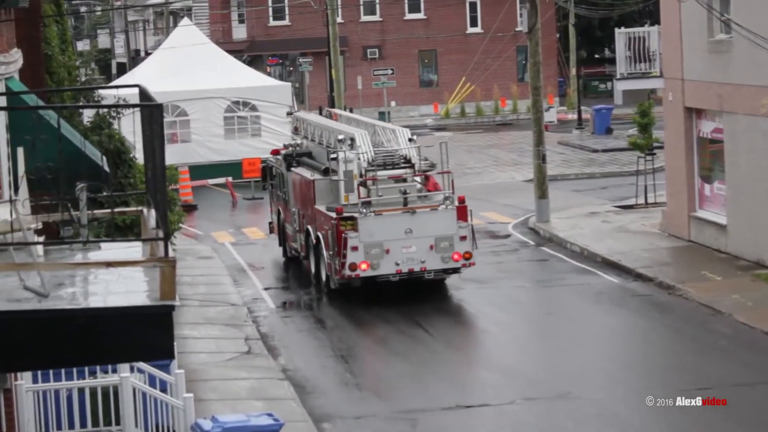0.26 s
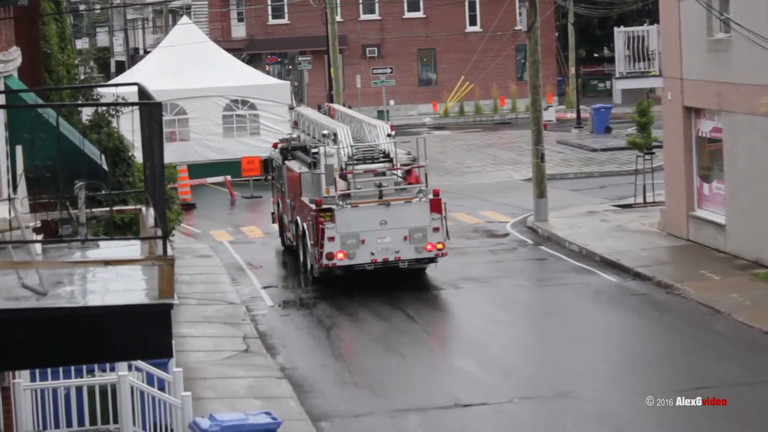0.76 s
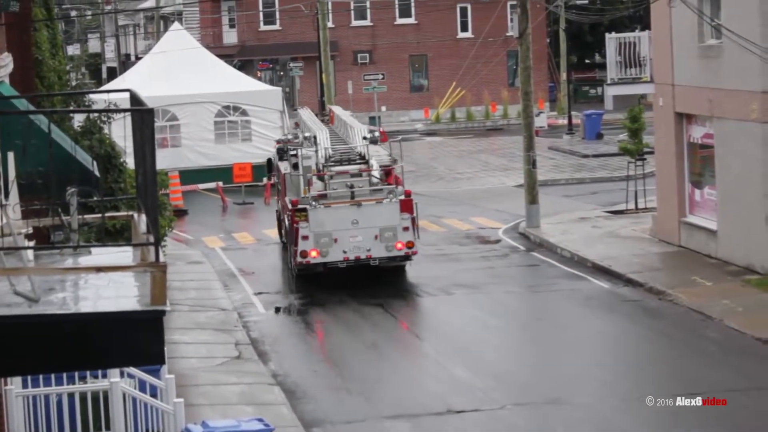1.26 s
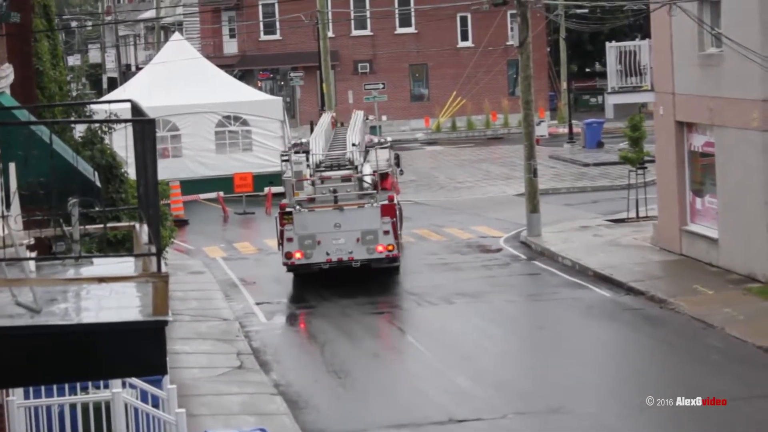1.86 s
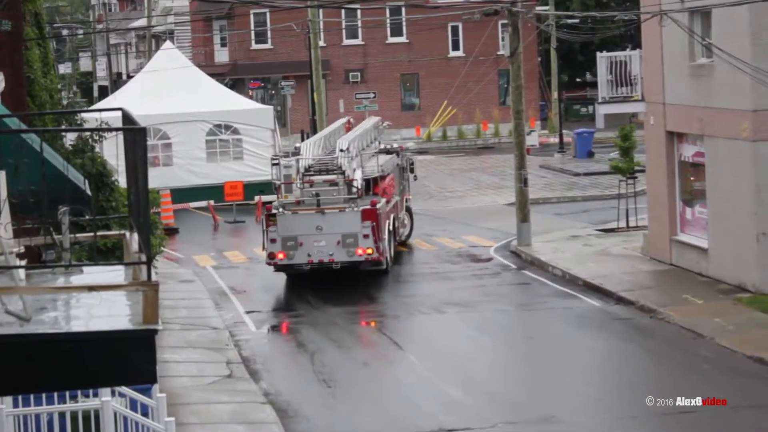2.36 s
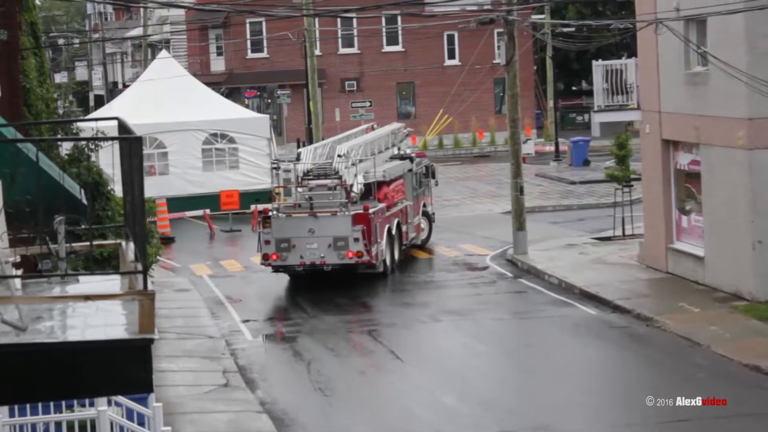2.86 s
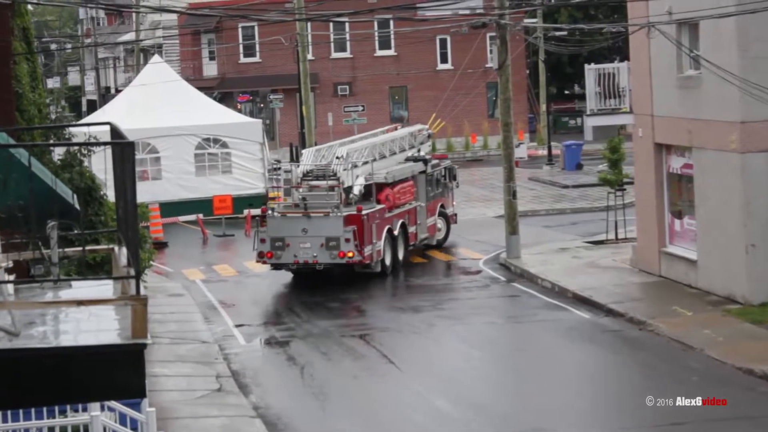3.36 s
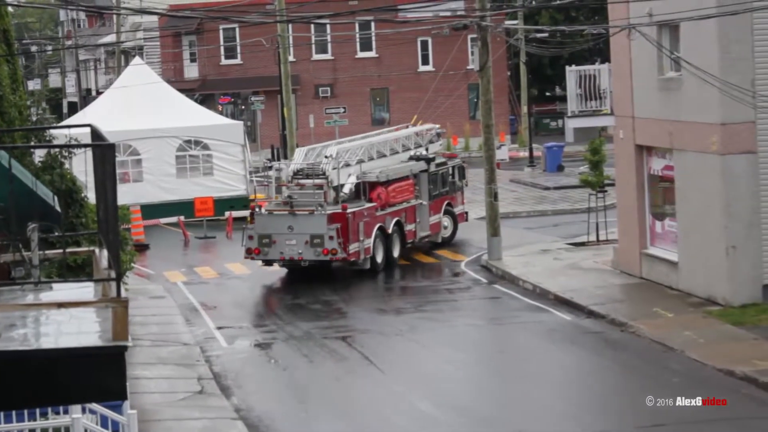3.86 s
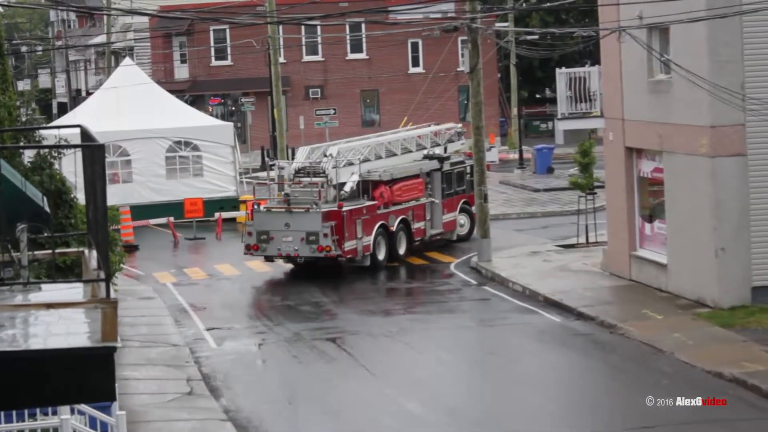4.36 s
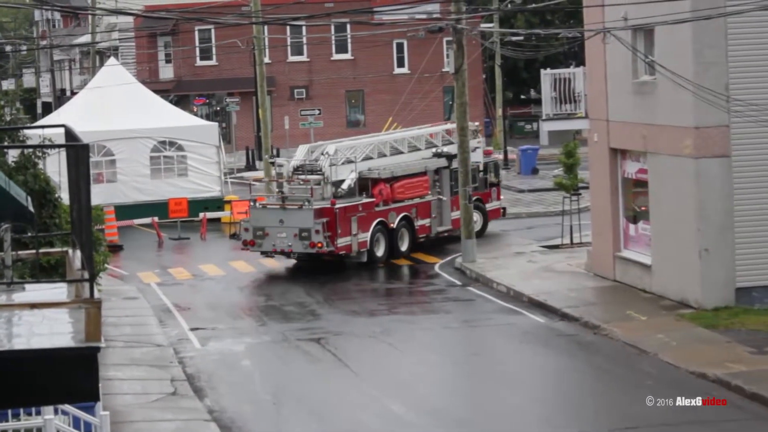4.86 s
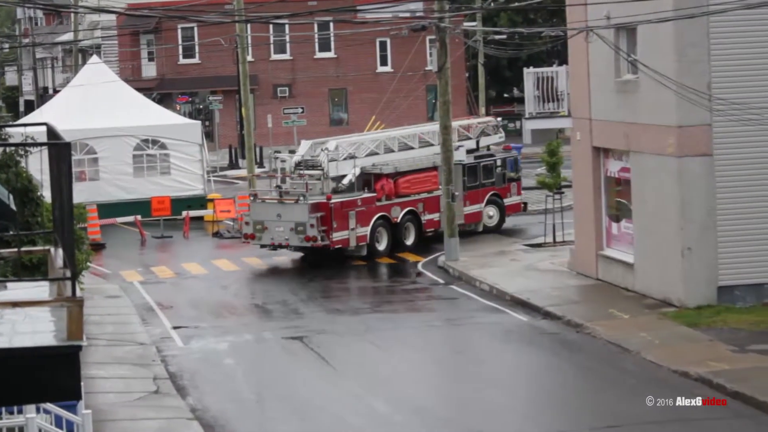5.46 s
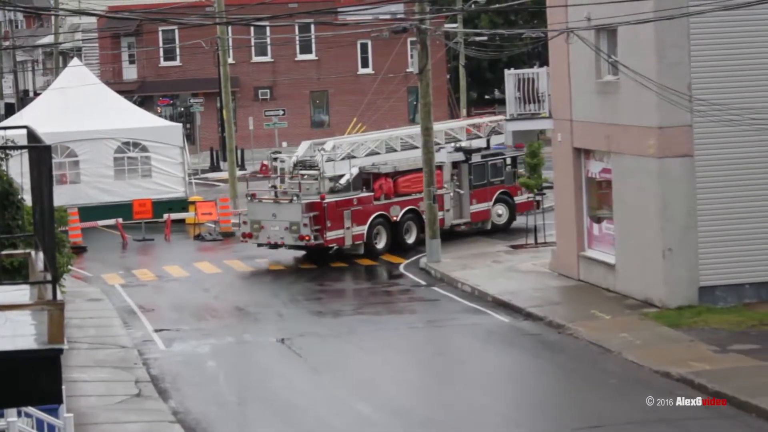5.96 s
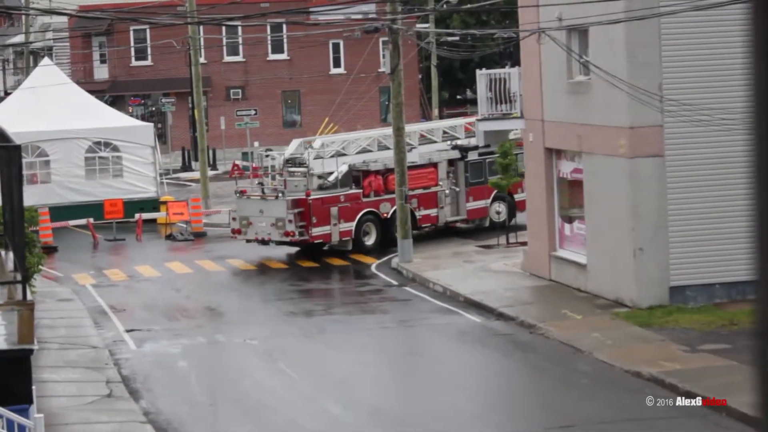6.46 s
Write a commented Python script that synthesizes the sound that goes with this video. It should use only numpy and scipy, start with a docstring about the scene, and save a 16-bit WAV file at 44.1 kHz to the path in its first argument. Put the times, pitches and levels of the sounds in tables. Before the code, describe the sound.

Big diesel engine eases down to a loud, booming idle on a wet street, air leaking briefly, then a short raspy squeal and faint rattles.

```python
"""Diesel truck turning on a wet street

A diesel ladder truck creeps away round a corner, its revs sinking to a throbbing idle.
The exhaust is a stack of steady tones tied to the engine cycle; block, housing and covers are shaken noise.
Tyre hiss and air leaks are coloured noise; one honking squeak is a set of wavering tones over a rasp.
A few creaks and light ticks are short bursts of noise, each round one pitch."""
import sys
import numpy as np
from scipy import signal
from scipy.fft import rfft, irfft, next_fast_len
from scipy.io import wavfile
from scipy.ndimage import uniform_filter1d, minimum_filter1d

SR = 44100
rng = np.random.default_rng(int(sys.argv[2]) if len(sys.argv) > 2 else 0)


def output_pcm(signal):
    """Save a mono or channel-first signal as 16-bit PCM at the path in sys.argv[1].

    Samples are clipped to [-1, 1] before scaling.
    """
    pcm = np.clip(np.atleast_2d(signal).T, -1, 1) * 32767
    wavfile.write(sys.argv[1], SR, np.round(pcm).astype(np.int16))


N = 295470
TIME = np.arange(N) / SR   # seconds
IDLE_RATE, EASING_RATE, REVVED_RATE = 11, 11.8, 12.7   # engine cycles per second


def from_db(db):
    """Turn decibels into gain."""
    return 10 ** (np.asarray(db) / 20)


def rms_one(x):
    """Scale to an rms (average strength) of 1."""
    return x / np.sqrt(np.mean(x ** 2) + 1e-20)


def in_time(rows):
    """Draw straight lines between the rows: each column's value at every sample."""
    s, *columns = np.transpose(rows)
    return [np.interp(TIME, s, column) for column in columns]


def drift(rate_hz):
    """Smooth random wandering with rms 1; a higher rate wanders faster."""
    step = 100   # worked out at every 100th sample, then joined by lines
    pole = np.exp(-2 * np.pi * rate_hz * step / SR)
    chance = rng.standard_normal(N // step + 2002)
    slow = signal.lfilter([1], [1, -2 * pole, pole * pole], chance)[2000:]
    return np.interp(np.arange(N) / step, np.arange(len(slow)), rms_one(slow))


def noise():
    """White noise: all pitches equally strong."""
    return rng.standard_normal(N)


def coloured(x, spectrum):
    """Filter a sound by a curve that falls 40 dB per octave beyond its ends; rms 1."""
    size = next_fast_len(N)
    octave = np.log2(np.maximum(np.fft.rfftfreq(size, 1 / SR), 1))
    hz, db = np.transpose(spectrum)
    curve_db = np.interp(octave, np.log2(hz), db)
    beyond = np.abs(octave - np.clip(octave, np.log2(hz[0]), np.log2(hz[-1])))
    filtered = rfft(x, size) * from_db(curve_db - 40 * beyond)
    return rms_one(irfft(filtered, size)[:N])


def resonance(x, hz, width_hz):
    """Ring at one pitch, like a struck panel (two-pole filter); rms 1."""
    pole = np.exp(-np.pi * width_hz / SR)
    ring = [1, -2 * pole * np.cos(2 * np.pi * hz / SR), pole * pole]
    return rms_one(signal.lfilter([1, 0, -1], ring, x))


def double_resonance(x, hz, width_hz):
    """Ring twice in a row, for a more pure pitch; rms 1."""
    return resonance(resonance(x, hz, width_hz), hz, width_hz)


def beats(turns, depth_db):
    """A gain that peaks at every whole turn, or midway if the depth is negative; rms 1."""
    return rms_one(from_db(depth_db * np.cos(2 * np.pi * turns)))


def swell(middle_s, length_s):
    """A bell-shaped rise and fall round one moment."""
    return np.exp(-2 * ((TIME - middle_s) / length_s) ** 2)


def knocks(cycle, firing_db, uneven_db, alike, count=8, size=4096):
    """Noise with a burst per firing, uneven over the cycle; part of its grain repeats on every cycle."""
    alike = np.clip(alike, 0, 1)
    place_in_cycle = (cycle * size).astype(int) % size
    repeating = rng.standard_normal(size)[place_in_cycle]
    grain = np.sqrt(alike) * repeating + np.sqrt(1 - alike) * noise()
    turns = cycle - .73
    firings = beats(count * turns, firing_db) * beats(count / 2 * turns, firing_db)
    return grain * firings * beats(2 * turns, uneven_db)


# Colour of the tyre hiss [pitch_hz, relative level_db]
TYRE_COLOUR = [(2000, -8.5), (4000, -1), (5500, 1), (7000, -1.5), (10000, -4.5), (13000, -8), (15500, -14)]


def wet_road(hiss_db, spray_db=2.0, drops_per_s=200, drop_size_db=3.4, drops_db=-6, flutter_db=.5):
    """Tyres peel water off the asphalt: a hiss with tiny splashes in it."""
    sizes = from_db(drop_size_db * np.minimum(rng.exponential(1, N), 4))
    drops = (rng.random(N) < drops_per_s / SR) * sizes
    fading = signal.lfilter([1], [1, -.97], drops + 1e-18)   # each drop dies away at once
    splashes = rms_one(fading * noise())
    spray = coloured(noise() + from_db(drops_db) * splashes, TYRE_COLOUR)
    return from_db(hiss_db + spray_db + flutter_db * drift(40)) * spray


# Leaks of compressed air [start_s, end_s, level_db at the start, fade_db_per_s]
AIR_LEAKS = [(-.02, .47, -39, 12), (.48, .68, -39.5, 15), (.88, 1.40, -41.5, 1)]


def air_leak(valve_s=.02):
    """Compressed air hisses in spurts, each sagging until a valve shuts over valve_s seconds."""
    flow = 0
    for start, end, db, fade in AIR_LEAKS:
        opening = np.clip(np.minimum(TIME - start, end - TIME) / valve_s + .5, 0, 1)
        flow = flow + opening * from_db(db - fade * np.maximum(TIME - start, 0))
    return flow * coloured(noise(), [(3000, 1), (5000, 1.5), (7500, -6), (10000, -2.5), (15000, -11)])


# Ticks of grit and fittings [start_s, level_db, pitch_hz]
TICK_EVENTS = [(.494, -32, 5400), (.88, -35, 9050), (1.633, -37, 5000), (2.162, -39.5, 7000),
               (3.325, -37, 9000), (3.39, -33, 5200), (3.49, -34, 8700), (3.897, -34, 5000),
               (3.957, -32, 6000), (6.028, -29, 1400)]


def ticks(fade_60db_s=0.087, relative_width=0.37):
    """Short bursts of ringing noise that start at once and fade, each round a pitch of its own."""
    out = np.zeros(N)
    for s, db, hz in TICK_EVENTS:
        age = np.clip(TIME - s, 0, 1)
        fading = (age > 0) * from_db(db - 60 * age / fade_60db_s)
        out += fading * resonance(noise(), hz, hz * relative_width)
    return out


# Faint creaks of the chassis [middle_s, length_s, level_db at the middle, pitch_hz]
CREAK_EVENTS = [(2.95, 0.06, -35, 1020), (3.117, 0.06, -33, 1144), (5.16, 0.05, -35, 1225),
                (5.412, 0.028, -32, 1620)]


def creaks(width_hz=70):
    """Brief narrow squeaks of ringing noise that swell and fade."""
    out = 0
    for s, length, db, hz in CREAK_EVENTS:
        out = out + from_db(db) * swell(s, length) * double_resonance(noise(), hz, width_hz)
    return out


def slip(start, end, attack_s, release_s, echo_db=-11.5, echo_release_s=.32):
    """The squeak builds, holds and dies away into the street's slower echo; times are per 20 dB."""
    before, after = np.maximum(start - TIME, 0), np.maximum(TIME - end, 0)
    tail_db = np.maximum(-20 * after / release_s, echo_db - 20 * after / echo_release_s)
    return from_db(np.maximum(tail_db - 20 * before / attack_s, -200))


# Tones of the squeak [pitch_hz, wander_hz, level_db relative to the ring, start_s, end_s of the hold]
SQUEAK_TONES = [(576, 21, -10.5, 2.974, 3.055), (1125, 50, -15, 2.98, 3.05), (1680, 8, -3, 2.986, 3.036),
                (2270, 40, -11.5, 2.974, 3.025), (2490, 40, -7, 3.006, 3.004),
                (2842, 15, -6.5, 2.979, 3.004), (3440, 70, -15, 2.98, 3.02)]
# Colour of the rasp under it [pitch_hz, relative level_db]
RASP_COLOUR = [(500, -6), (1000, 5), (2800, 2), (4000, -6), (6000, -15), (13000, -23), (15500, -20.5)]


def squeak(ring_db=-17, rasp_db=-21, hardest_s=3.006, judder_db=3.0,
           spit_db=-35, spit_s=3.03, spit_length_s=0.07):
    """A brake or joint sticks and slips: juddering tones over a rasp, with a spit of hiss."""
    tone = 0
    for hz, wander_hz, db, start, end in SQUEAK_TONES:
        pitch = hz + wander_hz / 2 * drift(57)
        partial = np.sin(2 * np.pi * np.cumsum(pitch) / SR)
        level = from_db(ring_db + db + judder_db * drift(50))
        tone = tone + level * slip(start, end, attack_s=0.017, release_s=0.04) * partial
    rasp_level = from_db(rasp_db + 2 * drift(120))
    rasp_shape = slip(hardest_s, hardest_s, attack_s=0.049, release_s=0.12)
    rasp = rasp_level * rasp_shape * coloured(noise(), RASP_COLOUR)
    hiss = coloured(noise(), [(6000, -3), (13500, 0), (15500, -7)])
    spit = from_db(spit_db) * swell(spit_s, spit_length_s) * hiss
    return tone + rasp + spit


# Spells of ringing in the engine covers
# [middle_s, length_s, level_db at the middle, pitch_hz, width_hz of each resonance, pulsing_db per cycle]
COVER_SPELLS = [(2.9, 1, -44, 3060, 190, 3), (3.52, .18, -38.5, 2160, 100, 2),
                (4.4, 2.3, -46.5, 2150, 100, 0), (4.9, 1.5, -45, 3220, 190, 4),
                (5.03, .28, -41, 2130, 100, 2), (5.716, 0.36, -38, 3170, 140, 4)]


def covers(cycle, chirp_place=0.78, flutter_db=1.5):
    """Loose covers ring in spells, most chirping once a cycle, as the truck's side swings round."""
    out = 0
    for s, length, db, hz, width, pulsing_db in COVER_SPELLS:
        shaken = noise() * beats(cycle - chirp_place, pulsing_db)
        out = out + from_db(db) * swell(s, length) * double_resonance(shaken, hz, width)
    return out * from_db(flutter_db * drift(14))


# Ringing of the engine housing [start_s, hum level_db, flank panels' shared level_db]
HOUSING_LEVELS = [(0, -37.5, -50), (1.0, -36.5, -48), (1.4, -41.5, -49.5), (3.0, -37.5, -49),
                  (4.0, -33.5, -42.5), (4.5, -41.5, -40), (6.7, -44, -40.5)]
# Panels on the flank of the engine [pitch_hz, width_hz, level_db relative to the shared level]
FLANK_PANELS = [(967, 26, 2), (797, 30, 0.5), (719, 21, 1.5), (634, 39, -1.5), (581, 17, -5.5),
                (459, 14, -4)]


def housing(cycle, hum_hz=845.3, hum_width_hz=62):
    """Knocks make the housing hum at one pitch; flank panels grow louder as the truck turns side-on."""
    hum_db, flank_db = in_time(HOUSING_LEVELS)
    blows = knocks(cycle, firing_db=2.0, uneven_db=1.5, alike=.6)
    hum = double_resonance(blows, hum_hz, hum_width_hz)
    flank = sum(from_db(db) * resonance(blows, hz, width) for hz, width, db in FLANK_PANELS)
    return from_db(hum_db) * hum + from_db(flank_db) * flank


# Colour of the block's clatter [pitch_hz, relative level_db]
CLATTER_COLOUR = [(330, -8), (420, -4), (520, -6.5), (650, -3.5), (800, -2), (1000, -4.5), (1300, -5),
                  (1700, -6), (2500, -15.5)]
# Colour of the rattle of injectors and valves [pitch_hz, relative level_db]
RATTLE_COLOUR = [(1000, -27), (1700, -5), (2200, -3), (2600, -1.5), (3200, 0.5), (4200, -4), (5500, -13),
                 (8000, -21), (12000, -34.5)]


def block(cycle, clatter_db, rattle_db, body_db=-1.0, top_db=-2.0, flutter_db=0.86):
    """Combustion knock shakes the block; injectors and valves rattle above it."""
    blows = knocks(cycle, firing_db=0.5, uneven_db=-0.1, alike=0.37)
    taps = knocks(cycle, firing_db=0.82, uneven_db=0.24, alike=0.21)
    clatter_gain = from_db(clatter_db + body_db + flutter_db * drift(8.8))
    rattle_gain = from_db(rattle_db + top_db + flutter_db * drift(30))
    return clatter_gain * coloured(blows, CLATTER_COLOUR) + rattle_gain * coloured(taps, RATTLE_COLOUR)


# The strongest puff, used by the exhaust too
# [start_s, place in the cycle 0-1, scatter 0-1: how far orders 10 to 17 fall out of step]
PUFF = [(0, .38, .15), (.65, .38, .2), (.8, .33, .7), (1.0, .33, 1), (2.0, .3, 1), (2.5, .5, .35),
        (3.1, .5, .15), (4.5, .46, .12), (5.3, .5, .1), (6.7, .5, .1)]
# Colour of the rumble [pitch_hz, relative level_db]
RUMBLE_COLOUR = [(35, -28), (60, -11), (90, -2), (140, 3.5), (240, -5.5), (300, -7), (370, -23), (600, -28)]


def rumble(cycle, rate, idle_db=-39, revved_db=-28.5):
    """Turbulent gas in the pipe: low noise puffing once per cycle, louder at higher revs."""
    place, _ = in_time(PUFF)
    level_db = np.interp(rate, [IDLE_RATE, REVVED_RATE], [idle_db, revved_db])
    puffs = noise() * beats(cycle - place, depth_db=3)
    return from_db(level_db) * coloured(puffs, RUMBLE_COLOUR)


# Order n is a tone that swings n times per engine cycle.
# Level of the exhaust boom, order 12 [start_s, level_db]
BOOM_LEVEL = [(0.0, -8), (0.3, -8.5), (0.45, -17), (0.6, -12.5), (0.8, -18), (1.0, -34.03), (1.3, -15),
              (1.6, -14.5), (1.95, -19.33), (2.6, -5.5), (3.2, -12), (3.9, -16), (4.25, -26), (4.6, -13.98),
              (5.55, -7.5), (6.7, -15.13)]
# Level of the drone, order 16, which comes in near idle [start_s, level_db]
DRONE_LEVEL = [(0, -38), (2.2, -32.5), (2.8, -19.5), (3.3, -12), (4.0, -16), (5.1, -30), (5.85, -13),
               (6.35, -8.5), (6.7, -10)]
# Change in level of the orders below 9 [start_s, level_db]
BASS_LEVEL = [(0, 1), (1.1, -2), (1.6, 2), (2.1, -2), (3.1, -2.5), (4.8, 2), (6.0, 0), (6.7, 0)]
# Change in level of the orders from 18 up [start_s, level_db]
UPPER_LEVEL = [(0, -3), (.45, 1.5), (1.2, 2), (2.1, -2.5), (2.9, 0), (3.5, -2.5), (4.35, 2.8), (5.6, -.5),
               (6.7, 1.2)]
# The other orders, before the changes above, the pipe's swell and the wavering
# [order, revved level_db, easing-off level_db, idle level_db]
OTHER_ORDERS = [(4, -32, -34, -33), (5, -41, -47, -50), (6, -38, -41, -48), (7, -34, -41, -43),
                (8, -30, -30, -39), (9, -29, -24, -33), (10, -26, -38, -34), (11, -17, -22, -26),
                (13, -22, -31, -37), (14, -33, -27, -22), (15, -39, -27, -23), (17, -33, -27, -30),
                (18, -41, -34, -41), (19, -32, -36, -32), (20, -34, -38, -33), (21, -39, -38, -33),
                (22, -44, -45, -36), (23, -48, -48, -36), (24, -54, -56, -43), (25, -52, -47, -33),
                (26, -61, -55, -45), (27, -56, -50, -54), (28, -57, -56, -46), (29, -58, -57, -51),
                (30, -50, -57, -52), (31, -57, -55, -49)]


def exhaust(cycle, rate, waver_db=2.13, pipe_hz=305, pipe_width_hz=12, pipe_db=9):
    """Gas pulses make clean engine orders; those near the boom can line up in one strong puff per cycle."""
    boom_db, = in_time(BOOM_LEVEL)
    drone_db, = in_time(DRONE_LEVEL)
    bass_db, = in_time(BASS_LEVEL)
    upper_db, = in_time(UPPER_LEVEL)
    place, scatter = in_time(PUFF)
    angle = 2 * np.pi * (cycle - place)
    boom_angle = 2 * np.pi * 12 * cycle
    boom = from_db(boom_db) * np.cos(boom_angle)
    drone = from_db(drone_db) * np.cos(boom_angle + 4 * angle)
    out = boom + drone
    for order, revved, easing, idle in OTHER_ORDERS:
        change_db = bass_db if order < 9 else 0 if order < 18 else upper_db
        db = np.interp(rate, [IDLE_RATE, EASING_RATE, REVVED_RATE], [idle, easing, revved]) + change_db
        # each order swells as it glides through the upper resonance of the pipe
        db = db + pipe_db * np.exp(-((order * rate - pipe_hz) / pipe_width_hz) ** 2)
        # away from the boom each order has its own random phase, so the puffs blur into a steady tone
        looseness = scatter if 9 < order < 18 else 1
        shift = looseness * rng.uniform(-np.pi, np.pi) + .3 * drift(.6)
        tone = np.cos(boom_angle + (order - 12) * angle + shift)
        out = out + from_db(db + waver_db * drift(2)) * tone
    return np.sqrt(2) * out   # a tone of 0 dB now has rms 1


# Engine speed, sinking to idle with one small blip [start_s, speed in cycles_per_s]
ENGINE_SPEED = [(0.0, 13.534), (0.15, 13.404), (0.42, 12.695), (0.66, 12.844), (1.13, 12.074),
                (1.7, 11.715), (2.55, 11.031), (3.2, 10.872), (5.1, 10.85), (6.2, 10.765), (6.7, 10.819)]
# The truck as it turns, before each layer's own trim
# [start_s, block clatter level_db, injector rattle level_db, tyre hiss level_db]
TURNING_TRUCK = [(0, -31, -36.5, -44.5), (0.7, -31, -38, -40), (2.2, -31.5, -37.5, -46),
                 (2.8, -29, -34, -43.5), (3.8, -29.5, -33, -40.8), (4.4, -30.3, -33.6, -43),
                 (5.7, -31.7, -35.7, -42.2), (6.7, -32, -37.7, -45.5)]


def scene():
    """One engine speed drives exhaust, rumble, block, housing and covers; the other sounds are added."""
    rate, = in_time(ENGINE_SPEED)
    cycle = np.cumsum(rate) / SR   # engine cycles turned so far
    clatter_db, rattle_db, hiss_db = in_time(TURNING_TRUCK)
    background = wet_road(hiss_db) + air_leak()
    details = ticks() + creaks() + squeak()
    metal = covers(cycle) + housing(cycle) + block(cycle, clatter_db, rattle_db)
    pipe = rumble(cycle, rate) + exhaust(cycle, rate)
    return (background + details + metal + pipe)[None]


def record(dry, ceiling=1.0, cutoff_hz=15600):
    """A fast limiter holds down peaks above the ceiling; a steep filter cuts the top."""
    room = np.minimum(1, ceiling / (np.abs(dry) + 1e-9))
    gain = uniform_filter1d(minimum_filter1d(room, size=400), size=400)
    top_cut = signal.ellip(10, .1, 90, cutoff_hz, fs=SR, output="sos")
    return signal.sosfilt(top_cut, dry * gain)


dry = scene()
out = record(dry)
output_pcm(out)
```